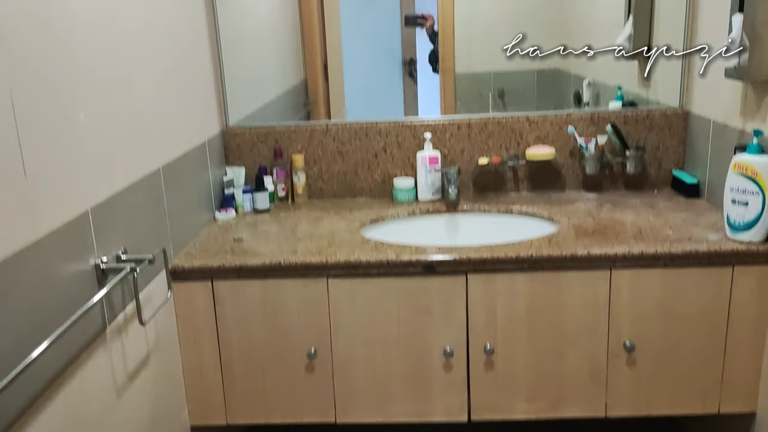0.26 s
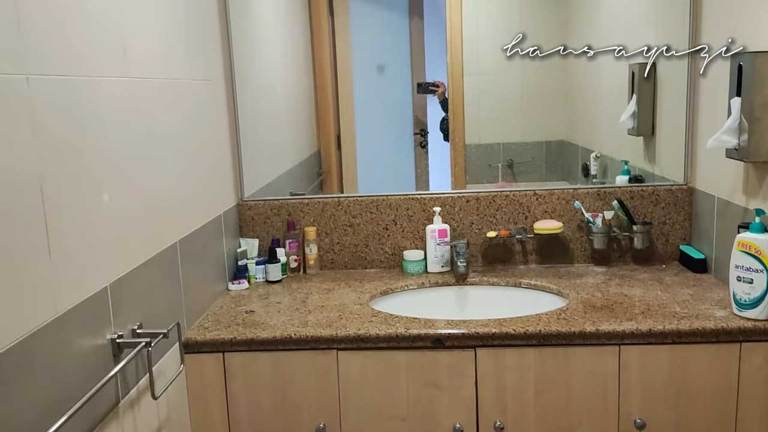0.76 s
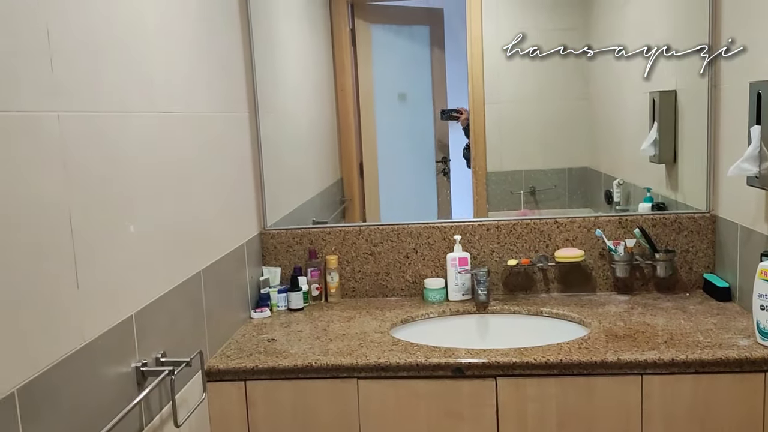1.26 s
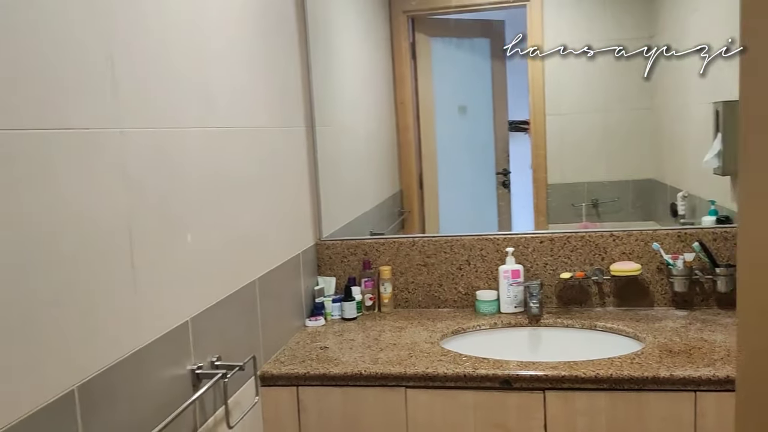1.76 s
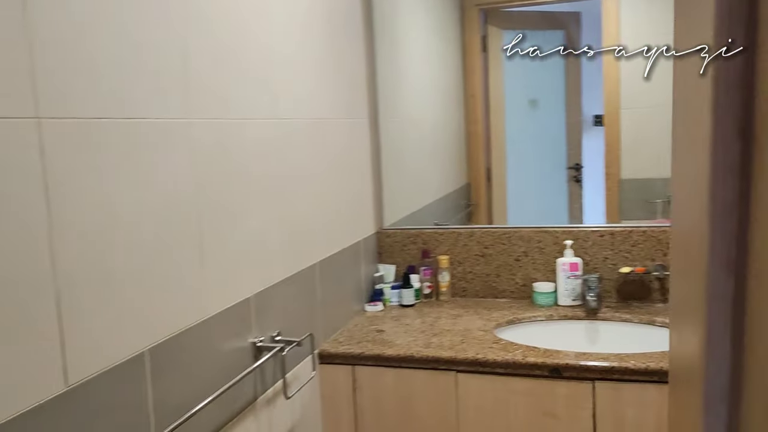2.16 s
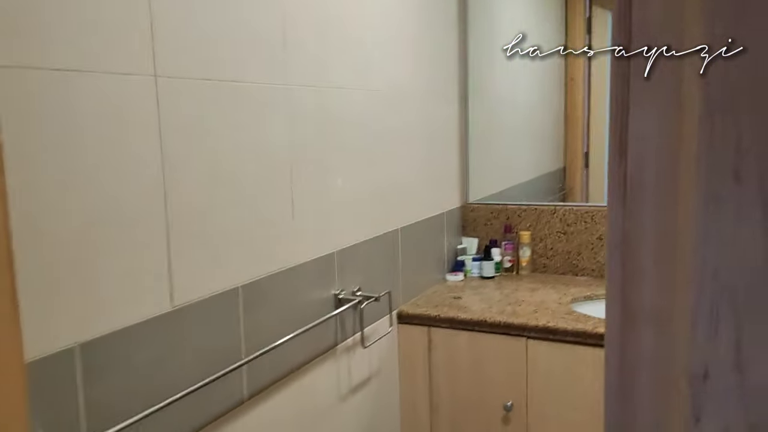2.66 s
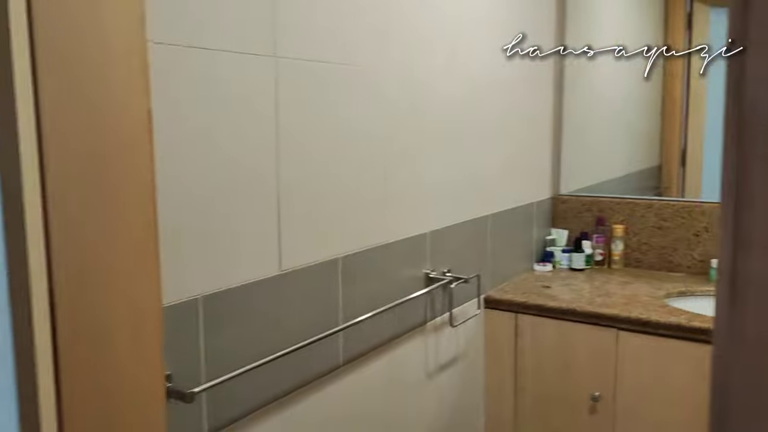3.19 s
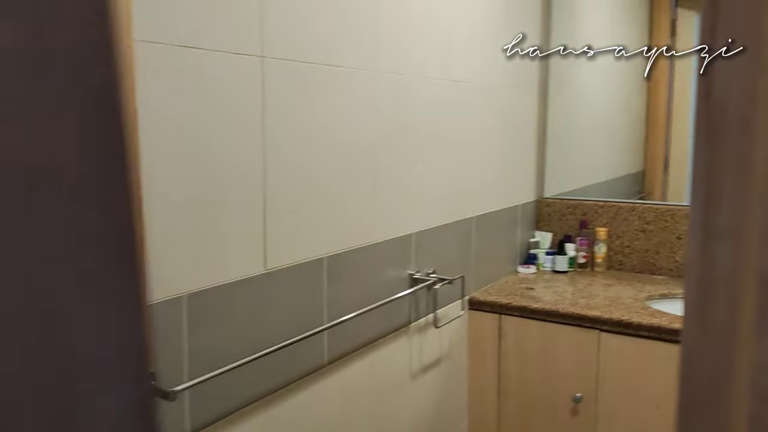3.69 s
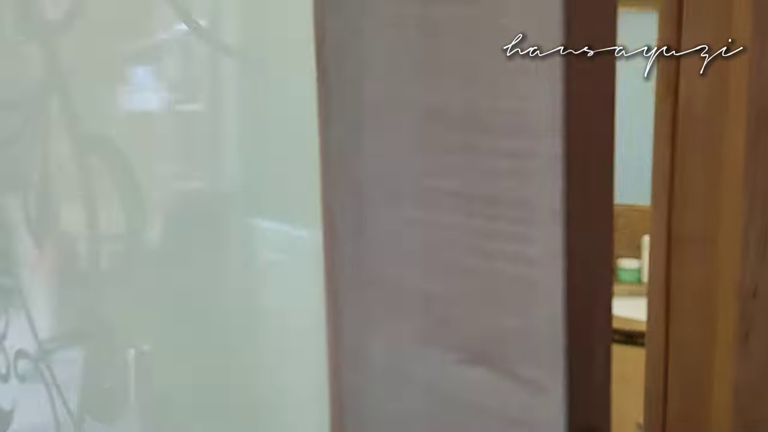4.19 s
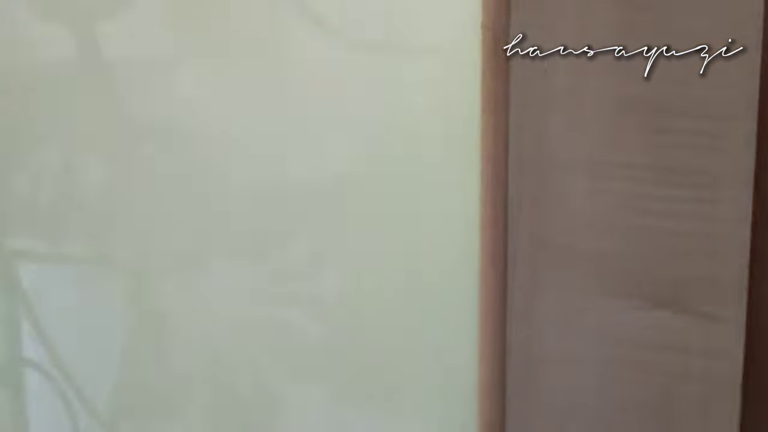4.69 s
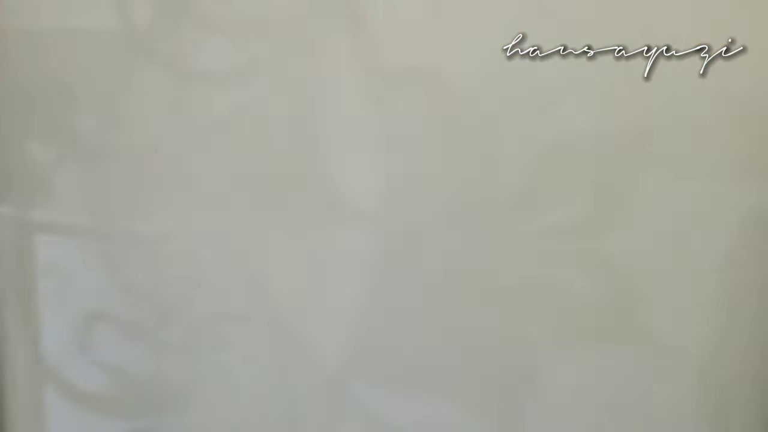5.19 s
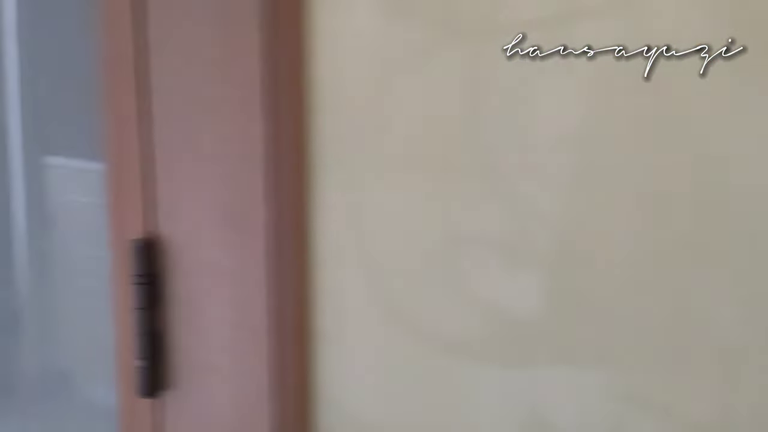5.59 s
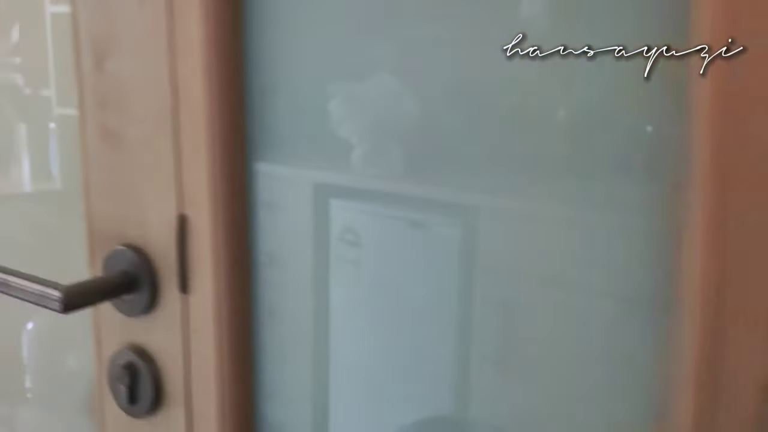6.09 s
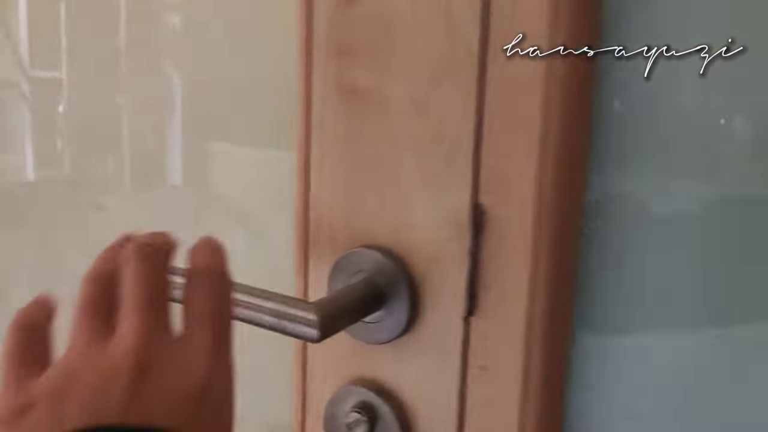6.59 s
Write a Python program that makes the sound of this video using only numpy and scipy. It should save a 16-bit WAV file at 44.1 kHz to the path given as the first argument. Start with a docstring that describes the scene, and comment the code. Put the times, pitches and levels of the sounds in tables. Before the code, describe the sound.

A faint fan runs throughout in a tiled bathroom: a low drone, soft rushing air and a thin, slightly wavering whine that dips and returns. Clothes rustle quietly near the handheld microphone. Small ticks and light shoe scuffs come at about 2.7 and 3.3 seconds, and a hinge gives very faint, high squeaks from 3.2 to 3.5. At 4.8 seconds a wooden door's latch strikes its plate with a sharp, close clack. At 5.0 it scrapes briefly and snaps home, the loudest moment, with a deep thump of air. Door and lever chatter rapidly, settling with a few softer knocks by 5.4. The hard walls ring for under a second over a low handling rumble. Afterwards the fan continues with soft rustling, a scuff at 5.8, a faint tick at 6.3 and a light sleeve swish around 6.5 seconds.

```python
"""A fan hums in a tiled bathroom as someone steps out, phone in hand, with rustles, scuffs and faint ticks.
A hinge squeaks softly as they draw the glazed wooden door shut. Near 4.8 s the latch bolt hits the
strike plate, then scrapes over its lip and snaps home. The leaf meets the frame with a deep push of air
and chatters against the bolt, rattling the lever. The hard walls ring on, leaving fan and soft rustle."""
import sys
import numpy as np
from scipy import signal
from scipy.fft import rfft, irfft
from scipy.io import wavfile
from scipy.ndimage import uniform_filter1d

SR = 44100
rng = np.random.default_rng(int(sys.argv[2]) if len(sys.argv) > 2 else 0)


def file_out(sig):
    """Save sig as 16-bit WAV at sys.argv[1]."""
    # one column per channel
    cols = np.atleast_2d(sig).T
    # limit, then scale
    lim = np.clip(cols, -1, 1)
    pcm = np.round(lim * 32767).astype(np.int16)
    wavfile.write(sys.argv[1], SR, pcm)


N = 302085
TIME = np.arange(N) / SR
SIDES = np.array([[1], [-1]])  # left, right


# Knocks and ticks: latch and door hits, plus faint handling ticks, a scuff and a soft bump of the door: #
# start_s, metal_db, wood_db, pan_db (left minus right), hardness_db (extra treble)
KNOCKS_AND_TICKS = [(2.7119, -46.5, -62, -2, -11.5), (3.343, -56, -51.5, -7, -6),
                    (3.367, -66, -48.5, 2, -6), (4.6814, -76, -44, -2, 0), (4.7604, -15.5, -29.5, 12, -51),
                    (4.762, -23.5, -18, 1.5, 13), (4.822, -61, -25, -3, -7), (4.9871, -48, -27, -3, -8),
                    (4.9928, -26.5, -27, 3, -8), (5.0067, -11.5, -30, 4, 1), (5.0348, -25.5, -22.5, -1, 8),
                    (5.112, -34, -21, -3, -16), (5.2631, -32, -38, 1, -8.5),
                    (5.3796, -39.5, -34.5, -3, -24), (6.3474, -62, -46.5, -8, -11)]
# Bright tone of a metal contact: frequency_hz, level_db
METAL_TONE = [(150, -15.5), (450, -14.5), (830, 5.5), (960, -1), (1170, 5), (1400, -0.5), (2100, 1),
              (3400, -1.5), (5000, -4.5), (7000, -1.5), (9000, -4), (11000, -14), (15000, -23.5)]
# Dark tone of a wooden contact: frequency_hz, level_db
WOOD_TONE = [(30, -7), (105, -8.5), (150, 3.5), (260, -4), (330, -3.5), (480, -6.5), (800, -8.5),
             (1000, -17), (2500, -30.5), (5000, -41), (12000, -54)]
# Body of the leaf and its pane: pitch_hz, level_db, t60_s
LEAF_MODES = [(144, -3, .7), (156, -4, .6), (210, -9, 1.1), (247, -8, .6), (286, -12, .6), (327, -8, .7),
              (364, -13, .55), (460, -20, .8), (577, -18, .6), (665, -13, .55), (754, -19, .7),
              (807, -14, .55), (944, -20, .6), (1156, -15, .65)]
# Ring of the latch and lever: pitch_hz, level_db, t60_s
LATCH_MODES = [(1107, -10, .4), (1588, -11, .35), (2021, -8, .4), (2666, -6, .6), (3302, -6, .35),
               (3447, -3, .35), (4114, -8, .35), (5383, -7, .2), (6691, -6, .22), (6837, -7, .22),
               (8489, -11, .25)]

def knocks_and_ticks(size=2 ** 16):
    """Loud door hits and faint small contacts share one voice: crack, thud, ringing modes and room."""
    out, t = np.zeros((2, N)), np.arange(size) / SR
    treble = 1 / (1 + (7000 / np.maximum(bins(size), 1)) ** 4)
    lock_tone = colour(METAL_TONE, size) * lock_case(size)
    for start_s, metal_db, wood_db, pan_db, hardness_db in KNOCKS_AND_TICKS + chatter():
        # a harder, shorter contact reaches further into the treble
        metal = undb(metal_db + hardness_db * treble) * lock_tone
        wood = undb(wood_db) * colour(WOOD_TONE, size)
        crack = irfft(diffuse(size) * metal * undb(4.5 + 0.85 * treble)) * fade(t, 0.054)
        thud = irfft(diffuse(size) * wood) * undb(5.5) * fade(t, 0.056) * (1 - fade(t, 0.023))
        room = tiled_room(undb(-5) * metal + undb(-3.5) * wood, t)
        wood_ring = undb(wood_db - 3.5) * ring(LEAF_MODES, t)
        metal_ring = undb(metal_db - 20.5) * ring(LATCH_MODES, t)
        # the direction blurs as the reflections take over
        pan = undb(pan_db * fade(t, 0.68) * SIDES / 2)
        add(out, start_s, (crack + thud + room + wood_ring + metal_ring) * pan)
    return out


def chatter(start_s=5.0258, period_s=0.0268, count=7):
    """Hits of the leaf bouncing evenly between frame and bolt, softening from metal to wood."""
    age_s = period_s * np.arange(count)
    metal_db = -25.5 - 27 * age_s
    wood_db = -25.5 + 24 * age_s  # the knocks grow as the leaf settles against the frame
    pan_db = -11 * np.exp(-age_s / 0.029)  # starts on the latch side and spreads over the leaf
    hardness_db = -1.5 - 44 * age_s
    return list(zip(start_s + age_s, metal_db, wood_db, pan_db, hardness_db))


def lock_case(size, spacing_hz=28, spread_db=3):
    """The lock case's many small resonances: one fine spectral ripple, the same for every hit."""
    ripple = np.interp(bins(size) / spacing_hz, np.arange(2048), rng.standard_normal(2048))
    return unit(undb(spread_db * ripple))


def ring(modes, t, apart_hz=2000):
    """Struck modes: low ones start with the hit, high ones at any phase and wider in stereo."""
    out = 0
    for (hz, db, t60), (jitter_db, offset, lag) in zip(modes, rng.standard_normal((len(modes), 3))):
        phase = offset * hz / 300 + SIDES * lag * min(hz / apart_hz, 2)
        out = out + undb(db + jitter_db) * fade(t, t60) * np.sin(2 * np.pi * hz * t + phase)
    return out * (1 - fade(t, 0.0061))


# Reverb tail of the tiled walls: frequency_hz, t60_s
WALL_DECAY = [(60, 1), (160, 0.78), (400, 0.67), (1000, 0.54), (2700, 0.85), (5000, 0.23), (9000, 0.47),
              (14000, 0.18)]

def tiled_room(tone, t, build_cycles=14):
    """Dense reflections of a hit: low octaves bloom late, and each dies at its own pace."""
    spectrum = diffuse(len(t)) * tone
    octave = np.log2(np.clip(bins(len(t)), 60, 15360) / 60)
    out = 0
    for k in range(9):
        hz = 60 * 2 ** k
        band = irfft(spectrum * np.maximum(1 - np.abs(octave - k), 0))
        bloom = 1 - fade(t, 0.005 + build_cycles / hz)
        out = out + band * bloom * fade(t, over_pitch(WALL_DECAY, hz))
    return out


# Bass thumps of air pushed by the leaf: start_s, level_db, pitch_hz, t60_s
AIR_PUSHES = [(4.694, -22.5, 23.8, 0.34), (4.763, -40, 43.6, 1), (4.987, -9.5, 45, 0.085),
              (5.070, -9, 28.2, 0.16), (5.119, -10.5, 27.1, 0.58), (5.276, -21, 23.07, 1.38)]

def air_pushes():
    """The leaf works as a piston on the closed room: deep, damped swings of pressure."""
    out = np.zeros((2, N))
    attack = 1 - fade(TIME, 0.021)
    for start_s, db, hz, t60 in AIR_PUSHES:
        add(out, start_s, undb(db) * np.sin(2 * np.pi * hz * TIME) * fade(TIME, t60) * attack)
    return out


def bolt_scrape():
    """The bolt grates over the lip of the strike plate just before it drops in."""
    grit = noise(colour(METAL_TONE, N)) * undb(2.5 * wander(900))
    return grit * swell(peak_s=4.996, db=-31, rise_s=0.0012, fall_s=0.0012, hold_s=0.01)


# Chirps of the hinge: peak_s, level_db, edge_s (rise and fall alike)
HINGE_CHIRPS = [(3.242, -67, .015), (3.342, -60, 0.007), (3.46, -69, 0.065)]

def hinge():
    """The turning hinge squeaks faintly on one high, unsteady pitch."""
    pitch_hz = 3040 + 22 * wander(25) + 30 * wander(300)
    return np.sin(phase_of(pitch_hz)) * sum(swell(s, db, edge, edge) for s, db, edge in HINGE_CHIRPS)


def person():
    """Clothes, soles and hand; cloth and soles share one fine, uneven grain of friction."""
    grain = undb(0.79 * wander(30) + wander(400))
    return clothes(grain) + soles(grain) + hand()


# Body moves that rustle the clothes: peak_s, level_db, rise_s, fall_s
BODY_MOVES = [(.63, -62, 0.35, 0.11), (2.3, -64.5, 0.32, 0.38), (2.62, -55.5, 0.044, 0.1),
              (2.8, -54.5, 0.1, 0.15), (3.15, -55.5, 0.094, 0.12), (3.42, -57, 0.067, 0.23),
              (4.53, -52.5, .025, 0.039), (4.6, -53.5, 0.49, 0.26), (5.52, -50, 0.25, 0.13),
              (5.88, -52.5, 0.1, 0.1), (6.275, -52, 0.038, 0.029), (6.48, -51, 0.2, 0.11),
              (6.76, -53, 0.17, 0.037)]
# Soft tone of sliding cloth: frequency_hz, level_db
CLOTH_TONE = [(100, 11.5), (400, 1), (800, 1), (1500, 2), (2900, -2), (5000, -10), (7000, -8.5),
              (9000, -11), (12000, -15.5), (15000, -23)]

def clothes(grain, stir_db=-77):
    """Cloth slides with each move and never quite rests; a sleeve reaching for the lever hisses."""
    motion = np.hypot(swells(BODY_MOVES), undb(stir_db))
    rustle = noise(colour(CLOTH_TONE, N)) * motion * undb(3)
    reach = swell(peak_s=6.51, db=-53, rise_s=0.034, fall_s=0.0091, hold_s=0.26)
    sleeve = noise(resonance(6100, 7000)) * reach
    return (rustle + sleeve) * grain


# Scuffs on the floor: start_s, level_db, length_s
SOLE_SCUFFS = [(2.70, -63, 0.41), (3.326, -49.5, 0.14), (5.82, -49, 0.17)]
# Dull tone of a brushing sole: frequency_hz, level_db
SOLE_TONE = [(100, -5), (250, -6), (800, 4.5), (1200, -2), (2000, -11), (3000, -17), (4500, -27),
             (12000, -30)]

def soles(grain):
    """Soles brush the floor, pressing quickly and easing off."""
    pressure = 0
    for start_s, db, length_s in SOLE_SCUFFS:
        progress = np.maximum(TIME - start_s, 0) / length_s
        pressure = pressure + undb(db) * (1 - np.exp(-12 * progress)) * np.exp(-progress ** 2)
    return noise(colour(SOLE_TONE, N)) * grain * pressure


# The hand jerks as the door shuts and sways while walking: peak_s, level_db, rise_s, fall_s
HAND_SWAYS = [(5.1, -31.5, 0.25, 0.47), (6.5, -43.5, 1.0, 0.53)]
# Fingers shifting their grip: peak_s, level_db, rise_s, fall_s
FINGER_SHIFTS = [(.25, -53.5, 0.54, 0.5), (1.9, -57, 0.094, 0.047), (6.6, -54, .4, 0.56)]

def hand(steady_db=-63.5):
    """Handling noise: the hand rocks the phone with a sub-bass rumble and the fingers rub on it."""
    rumble_tone = [(8, 1), (26, 2.5), (40, -17), (70, -25), (120, -33.5), (400, -50), (2000, -93)]
    rumble = noise(colour(rumble_tone, N)) * (undb(steady_db) + swells(HAND_SWAYS))
    fingers = noise(resonance(128, 87)) * swells(FINGER_SHIFTS)
    return rumble + fingers


# Quiet spots in the whine's standing waves: centre_s, depth_db, half_width_s
WHINE_DIPS = [(0, 4.5, 0.43), (2.34, 10.5, 0.38), (3.4, 8.5, 0.69), (4.72, 11, 0.11), (6.3, 8, 0.15)]

def fan_whine(pitch_hz=523.5, level_db=-55.5, pan_db=3):
    """The fan's slightly wavering note ducks wherever the phone passes a quiet spot."""
    note = np.sqrt(2) * np.sin(phase_of(pitch_hz + 1.6 * wander(5.5)))
    dip_db = sum(depth_db * np.exp(-((TIME - s) / width) ** 2) for s, depth_db, width in WHINE_DIPS)
    flutter_db = 0.76 * wander(9.6)
    return note * undb(level_db - dip_db + flutter_db + pan_db * SIDES / 2)


# Hum of fan and duct: pitch_hz, half_width_hz, level_db
DUCT_RESONANCES = [(208.4, 2.8, -67), (247.3, 5.8, -67.5), (453, 2.5, -70.5), (752.6, 6.7, -73),
                   (2770, 80, -88.5)]
# Level ride of the duct's drone, strongest in the doorway: time_s, level_db
DRONE_RIDE = [(0, -50.5), (2.0, -50.5), (3.2, -46.5), (5.7, -49.5), (6.3, -52.5)]
# Tone of the rushing air: frequency_hz, level_db
AIR_TONE = [(20, 3.5), (45, -5), (90, -8.5), (200, -8.5), (350, -16.5), (700, -21), (1400, -24),
            (3200, -36), (5000, -38), (9000, -42.5), (15000, -38.5)]

def air_duct(drone_hz=55.5, rush_db=-51):
    """Air rushes softly through the duct's resonances over a low drone."""
    drone = noise(resonance(drone_hz, 7.8)) * curve(DRONE_RIDE)
    hum_tone = sum(undb(db) * resonance(hz, width) for hz, width, db in DUCT_RESONANCES)
    rush_tone = undb(rush_db) * colour(AIR_TONE, N)
    return drone + noise(np.hypot(hum_tone, rush_tone))


# Thin overtones of the fan motor: pitch_hz, level_db
MOTOR_OVERTONES = [(2790, -81.5), (3090, -102), (3420, -81.5), (3500, -87)]

def fan_motor():
    """The motor sings in faint, high bands of noise, so narrow that they flutter."""
    return sum(noise(resonance(hz, 4.8)) * undb(db) for hz, db in MOTOR_OVERTONES)


def undb(db):
    """Decibels to gain."""
    return 10 ** (np.asarray(db) / 20)


def unit(x):
    """Scale to rms 1."""
    return x / np.sqrt(np.mean(np.abs(x) ** 2))


def bins(size):
    """Frequencies in the spectrum of that many samples."""
    return np.fft.rfftfreq(size, 1 / SR)


def over_pitch(rows, hz):
    """Read (frequency_hz, value) rows on a log-frequency axis."""
    row_hz, value = np.transpose(rows)
    return np.interp(np.log(np.maximum(hz, 1)), np.log(row_hz), value)


def colour(rows, size):
    """EQ curve of unit power from (frequency_hz, level_db) rows."""
    return unit(undb(over_pitch(rows, bins(size))))


def resonance(hz, half_width_hz):
    """EQ curve of unit power with a single peak."""
    return unit(1 / (1 + ((bins(N) - hz) / half_width_hz) ** 2))


def diffuse(size, apart_hz=1250):
    """Noise spectra at two close microphone ports: alike in the bass, unrelated in the treble."""
    mid, side = rfft(rng.standard_normal((2, size)))
    width = np.clip(bins(size) / apart_hz, 0.22, 1)
    return (mid + SIDES * width * side) / np.sqrt(1 + width ** 2)


def noise(tone):
    """A scene-long bed of stereo noise through an EQ curve."""
    return irfft(diffuse(N) * tone, N)


def wander(rate_hz):
    """Smooth random drift on a scale of about 1."""
    hold = int(SR / rate_hz)
    steps = np.repeat(rng.standard_normal(N // hold + 1), hold)
    return 0.93 * uniform_filter1d(uniform_filter1d(steps, hold), hold)[:N]


def phase_of(pitch_hz):
    """Running phase of a moving pitch."""
    return 2 * np.pi * np.cumsum(pitch_hz) / SR


def fade(t, t60):
    """Exponential decay, 60 dB down after t60 seconds."""
    return np.exp(-np.log(1000) * t / t60)


def curve(rows):
    """Envelope from (time_s, level_db) rows."""
    return undb(np.interp(TIME, *np.transpose(rows)))


def swell(peak_s, db, rise_s, fall_s, hold_s=0):
    """Envelope of one movement: it grows, holds and dies away."""
    away = np.maximum(peak_s - TIME, 0) / rise_s + np.maximum(TIME - peak_s - hold_s, 0) / fall_s
    return undb(db) / np.cosh(np.clip(away, 0, 20))


def swells(rows):
    """Joint envelope of several movements, whose powers add."""
    return np.sqrt(sum(swell(*row) ** 2 for row in rows))


def add(out, start_s, sound):
    """Mix a sound in at a time."""
    i = int(start_s * SR)
    out[:, i:i + sound.shape[-1]] += sound[..., :N - i]


def scene():
    """The closing door and small ticks up front, over the fan and the person who carries the phone."""
    foreground = knocks_and_ticks() + bolt_scrape() + hinge() + air_pushes()
    fan = fan_whine() + air_duct() + fan_motor()
    return foreground + fan + person()


# Tone of the phone's two microphone ports: frequency_hz, left_db, right_db
PORT_EQ = [(94, 2.5, 2.5), (650, 2, -0.5), (1550, -2.5, -1.5), (2690, -0.5, 6), (4260, 2, 3.5),
           (7300, -3, -1), (7870, -21, 3.5), (8630, -4.5, 12), (9650, 0, 7), (10540, -5, 1.5),
           (11900, -2, 6.5), (13600, -2, -2.5)]

def record(dry):
    """Each port adds its own resonances; the phone rounds the peaks and cuts the top."""
    hz, *ports_db = np.transpose(PORT_EQ)
    heard = []
    for channel, db in zip(dry, ports_db):
        # folding the cepstrum turns the EQ curve into a minimum-phase filter
        cepstrum = irfft(over_pitch(np.c_[hz, db], bins(1024)) * np.log(10) / 20)
        folded = np.r_[cepstrum[0], 2 * cepstrum[1:512], np.zeros(512)]
        impulse = irfft(np.exp(rfft(folded)))
        heard.append(signal.fftconvolve(channel, impulse)[:N])
    high_cut = signal.ellip(8, 0.2, 70, 15500, fs=SR, output="sos")
    return signal.sosfilt(high_cut, np.tanh(heard))


dry = scene()
out = record(dry)
file_out(out)
```